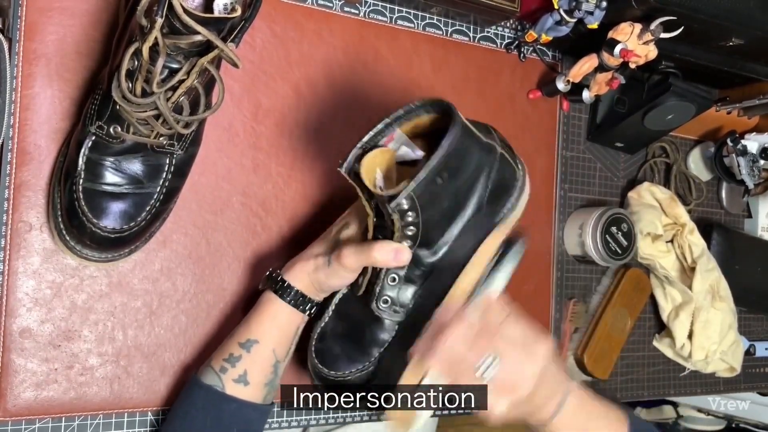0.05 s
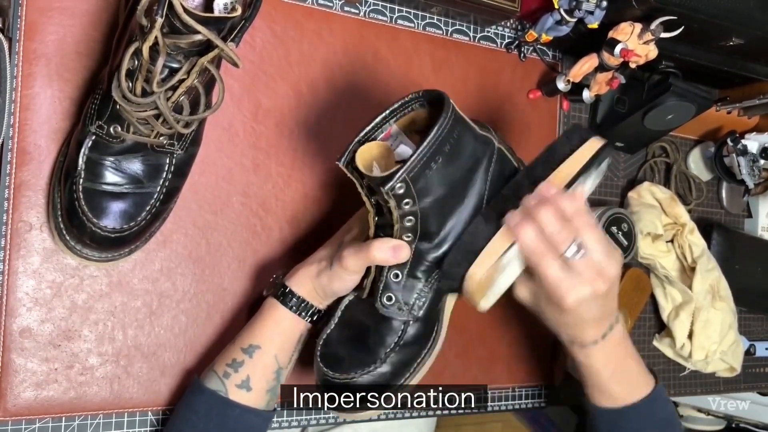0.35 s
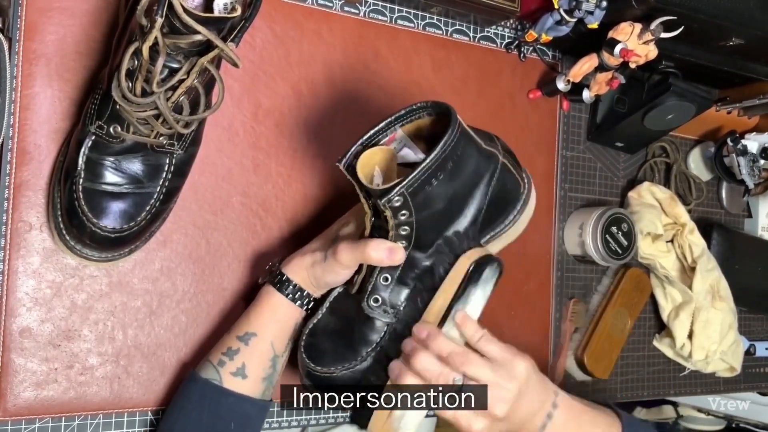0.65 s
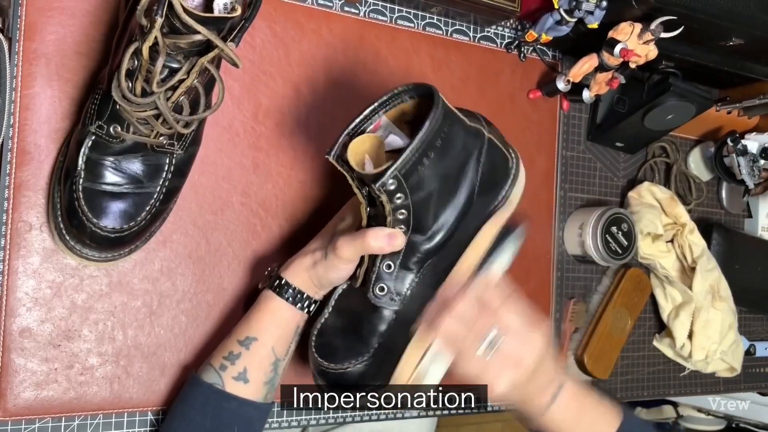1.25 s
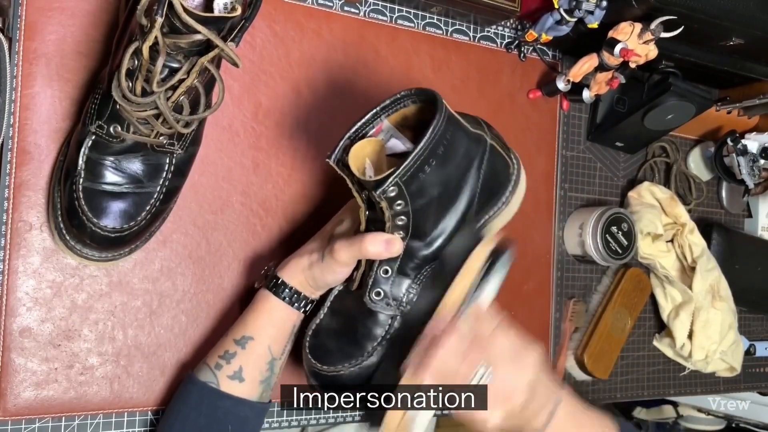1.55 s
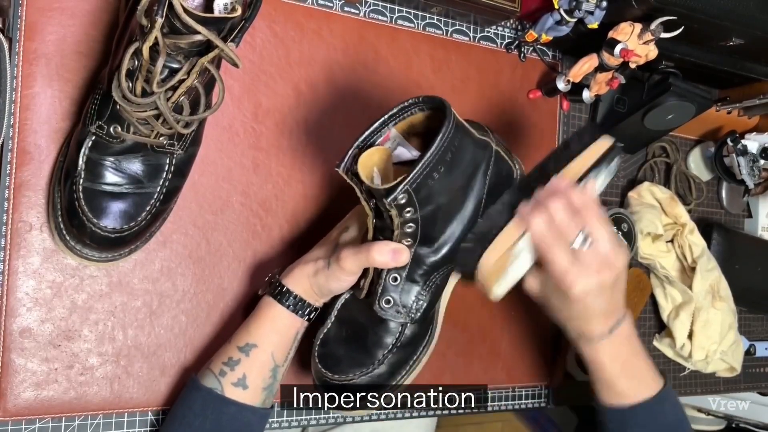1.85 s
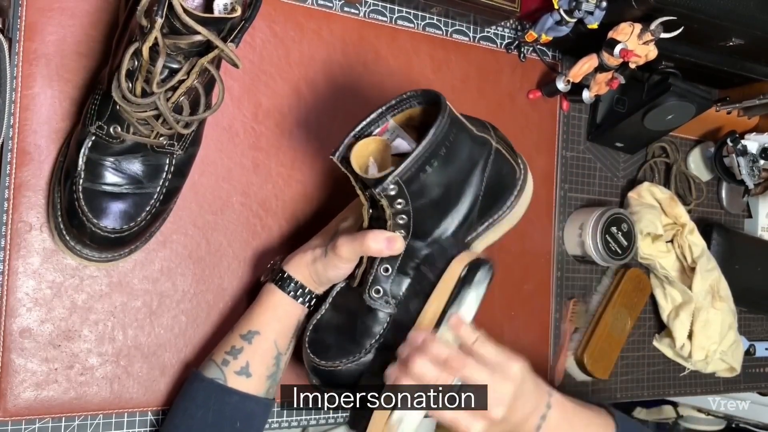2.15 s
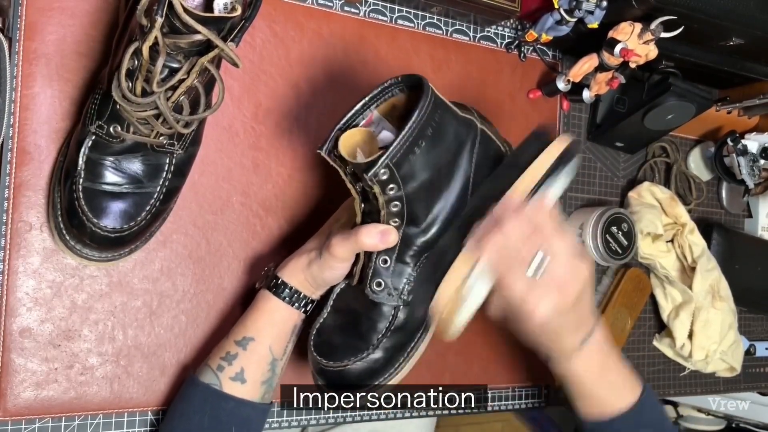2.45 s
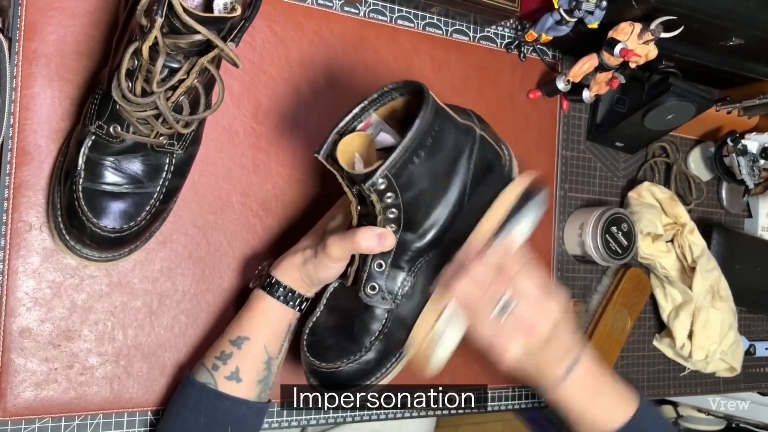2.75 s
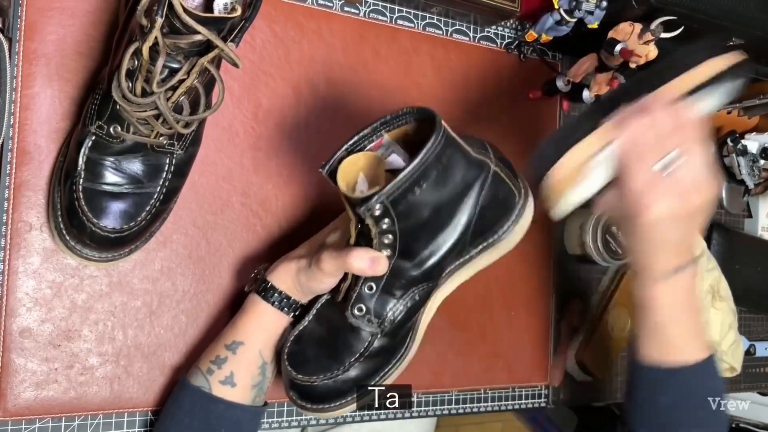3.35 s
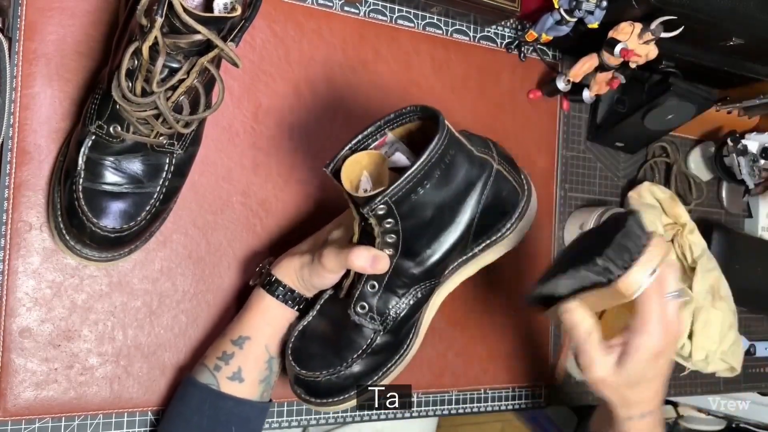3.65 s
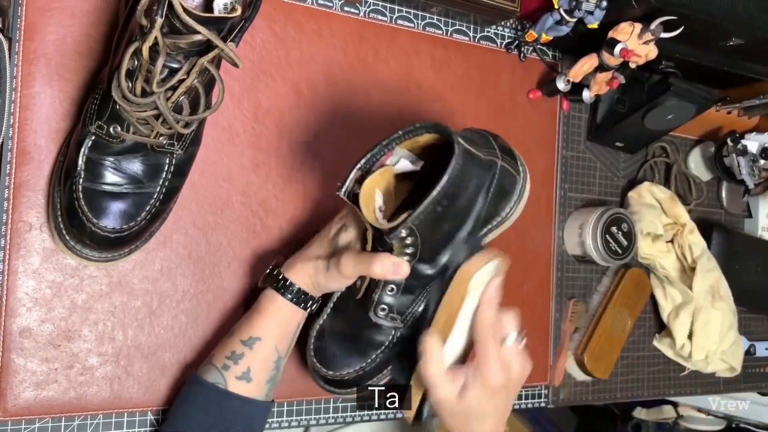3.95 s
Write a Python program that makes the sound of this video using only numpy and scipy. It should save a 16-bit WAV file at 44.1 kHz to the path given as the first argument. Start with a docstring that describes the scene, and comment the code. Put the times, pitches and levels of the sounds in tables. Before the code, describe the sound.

Fast, even brush strokes rasp and hiss on a hollow leather boot close to the microphone indoors. The scrubbing stops briefly for two sharp wooden handle clicks and a faint dull thud, then starts again.

```python
"""A bristle brush rasps and hisses back and forth over a leather boot, about nine strokes a second.
Stick-slip friction of many bristles makes the noise, and the hollow boot thumps where the brush bumps it.
The arm puffs air at each turn; air rumbles and a faint whine hangs in the small room.
Near the end the hand stops and turns the brush over with two sharp clicks of its wooden handle.
The block meets the boot with a dull thud, and the brushing goes on."""
import sys
import numpy as np
from scipy import signal
from scipy.fft import rfft, irfft
from scipy.io import wavfile
from scipy.ndimage import uniform_filter1d

SR = 44100
rng = np.random.default_rng(int(sys.argv[2]) if len(sys.argv) > 2 else 0)


def wav_out(sig):
    """Save sig, one row per channel (or a flat mono array), as 16-bit PCM at SR to the path in sys.argv[1]."""
    wavfile.write(sys.argv[1], SR, np.round(np.clip(np.atleast_2d(sig).T, -1, 1) * 32767).astype(np.int16))


N = 176400
TIME = np.arange(N) / SR


def amp(db):
    """Decibels to amplitude ratio."""
    return 10 ** (np.asarray(db) / 20)


def unit_rms(x):
    """Normalisation to unit mean power."""
    return x / np.sqrt(np.mean(x ** 2) + 1e-20)


def add(mix, start_s, sound):
    """Superposition: a sound joins the mix at its start time."""
    part = mix[max(round(start_s * SR), 0):][:len(sound)]
    part += sound[:len(part)]


def envelope(points):
    """Gain interpolated in decibels between (time [s], level [dB]) points."""
    return amp(np.interp(TIME, *np.transpose(points)))


def coloured(x, spectrum, resonances=()):
    """Minimum-phase filter of unit energy, from a spectral envelope and resonance peaks."""
    hz = abs(np.fft.fftfreq(16384, 1 / SR))
    knots_hz, knots_db = np.transpose(spectrum)
    db = np.interp(np.log(hz + 1), np.log(knots_hz + 1), knots_db)
    db += sum(lift / (1 + (2 * (hz - centre) / width) ** 2) for centre, width, lift in resonances)
    response = np.exp(np.conj(signal.hilbert(np.log(amp(db)))))
    taps = np.fft.ifft(response).real[:len(hz) // 2]
    return signal.fftconvolve(x, taps / np.linalg.norm(taps))[:len(x)]


def wander(rate_hz):
    """Random modulation: low-pass noise of rms 1."""
    hz = np.fft.rfftfreq(N, 1 / SR)
    return unit_rms(irfft(rfft(rng.standard_normal(N)) / (1 + (hz / rate_hz) ** 4), N))


def slips(per_s, spread_db):
    """Stick-slip friction as shot noise: random impulses, a few stronger than the rest."""
    size = amp(spread_db * np.minimum(rng.exponential(1, N), 5))
    return unit_rms(size * rng.choice([-1, 1], N) * (rng.random(N) < per_s / SR))


# Strokes, alternately out and back: (time [s], duration [s], pressure level [dB], hiss level [dB])
STROKE_PLAN = [(-0.006, 0.11, -1, 1.5), (0.084, 0.12, 1, -2.3), (0.211, 0.11, -0.5, 1.5),
               (0.315, 0.099, 1.7, -2.2), (0.424, 0.097, -0.3, 2.5), (0.525, 0.1, 1.5, -1),
               (0.639, 0.1, -0.8, 0.7), (0.737, 0.12, 0, -1.5), (0.851, 0.12, -2.0, 0.5),
               (0.962, 0.098, 1.8, -0.4), (1.065, 0.12, -1.4, -1.7), (1.167, 0.098, 1.0, -0.5),
               (1.27, 0.13, -1.2, -2.7), (1.377, 0.099, 0.6, -3), (1.481, 0.13, -0.5, -1.1),
               (1.6, 0.096, -0.1, -3), (1.696, 0.12, -1.5, 0.3), (1.814, 0.11, 0.8, -1.1),
               (1.919, 0.11, -0.5, 1.7), (2.03, 0.11, 1.2, -2), (2.144, 0.1, -1, 1), (2.243, 0.12, 0, -1.6),
               (2.355, 0.12, -0.4, 1), (2.463, 0.106, 1.5, -1.4), (2.572, 0.11, -0.9, 1.5),
               (2.68, 0.1, 0.1, -0.5), (2.787, 0.11, -1, 0), (2.89, 0.1, 1, -1.0), (2.996, 0.11, -0.3, 1.5),
               (3.105, 0.1, 0.8, -1.1), (3.207, 0.11, -0.7, 2.5), (3.847, 0.088, -1.5, -6.5),
               (3.961, 0.11, -4, -1)]


def stroking(shapes, settle_s, tips=False):
    """Friction noise follows sliding speed: a stroke lands, speeds up, slows and dies away."""
    gain = np.zeros(N)
    landing_s, landing_width_s = 0.017, 0.0098
    for k, (start, length, pressure_db, hiss_db) in enumerate(STROKE_PLAN):
        rise, fall, turn_db, swell_db, scuff_db = shapes[k % 2]
        on = (TIME >= start) & (TIME < start + length + 10 * settle_s)
        t = TIME[on] - start
        progress = np.minimum(t / length, 1)
        speeding = np.sin(np.pi / 2 * np.minimum(progress / rise, 1))
        slowing = np.sin(np.pi / 2 * np.minimum((1 - progress) / fall, 1))
        speed = (speeding * slowing) ** 2
        settling = np.exp(-np.maximum(t - length, 0) / settle_s)
        slide = amp(turn_db * (1 - speed) + swell_db * (progress - 1)) * settling
        scuff = amp(scuff_db) * np.exp(-((t - landing_s) / landing_width_s) ** 2)
        gain[on] = amp(hiss_db if tips else pressure_db) * np.hypot(slide, scuff)
    return uniform_filter1d(gain, size=150)


# Out and back stroke: (rise [fraction], fall [fraction], turn level [dB], swell [dB], scuff [dB])
SCRUB_STROKE = [(0.13, 0.65, -10.5, -1.9, -13), (0.23, 0.62, -5.5, 2.5, -10.5)]
# Spectrum of the scrub: (frequency [Hz], level [dB])
SCRUB_SPECTRUM = [(100, -28), (250, -6), (550, 3.5), (680, -3.5), (1150, 0.5), (1550, -1.5), (2000, 2),
                  (2500, -11), (5000, -37.5)]
# Resonances of boot and brush block: (frequency [Hz], bandwidth [Hz], lift [dB])
CONTACT_MODES = [(550, 92, 3), (725, 100, 6), (873, 77, 6), (1110, 115, 5), (1292, 30, 5), (1790, 45, 5.5),
                 (1838, 65, 2.5), (3945, 510, 5.5)]


def scrub():
    """Stick-slip of bristles on leather excites boot and block in a rough midrange scrub."""
    friction = slips(per_s=5000, spread_db=1.5) * stroking(SCRUB_STROKE, settle_s=0.011)
    roughness = amp(2.14 * wander(rate_hz=110))
    return amp(-53) * coloured(friction * roughness, SCRUB_SPECTRUM, CONTACT_MODES)


# Out and back stroke: (rise [fraction], fall [fraction], turn level [dB], swell [dB], scuff [dB])
RASP_STROKE = [(0.23, 0.35, -8.3, -1.05, -17), (0.53, 0.35, -11, -0.5, -4)]
# Spectrum of the rasp: (frequency [Hz], level [dB])
RASP_SPECTRUM = [(200, -12.5), (600, -7), (1300, 2.5), (2000, 2), (2400, 2.5), (3000, 4.5), (4000, 0),
                 (5300, 1), (6300, -7), (9000, -6.5), (16000, -24)]


def rasp(clumps):
    """Denser stick-slip drives the same resonances with a brighter spectrum."""
    friction = slips(per_s=9000, spread_db=1) * stroking(RASP_STROKE, settle_s=0.018)
    return amp(-49.5) * coloured(friction * amp(0.73 * clumps), RASP_SPECTRUM, CONTACT_MODES)


# Out and back stroke: (rise [fraction], fall [fraction], turn level [dB], swell [dB], scuff [dB])
HISS_STROKE = [(.32, 0.31, -17.5, 0.5, -28), (0.41, 0.23, -18, -3, -24)]
# Spectrum of the bristle tips: (frequency [Hz], level [dB])
HISS_SPECTRUM = [(500, 5.5), (2500, -3), (4500, 3.5), (6400, 0), (7800, 2), (10600, 1), (12400, 4),
                 (14000, 1), (16000, 1)]


def tip_hiss(clumps):
    """Shot noise: slips of the bristle tips merge into a broadband hiss."""
    friction = slips(per_s=18000, spread_db=1) * stroking(HISS_STROKE, settle_s=0.027, tips=True)
    return amp(-49) * coloured(friction * amp(0.39 * clumps), HISS_SPECTRUM)


# Out and back stroke: (rise [fraction], fall [fraction], turn level [dB], swell [dB], scuff [dB])
DRAG_STROKE = [(0.22, 0.53, -11.5, -2.5, -1.5), (0.47, 0.7, -4, 0.26, -4.5)]
# Response of the hollow boot: (frequency [Hz], level [dB])
BOOT_SPECTRUM = [(40, -4), (130, -28.5), (200, -7), (235, -11), (275, -2), (320, -4), (370, -6), (440, -7),
                 (510, -26.5), (800, -24), (2000, -50.5)]
# Resonances of its cavity: (frequency [Hz], bandwidth [Hz], lift [dB])
CAVITY_MODES = [(276, 31, 2.5), (317, 26, 1.5), (362, 22, 1.5), (392, 27, 1)]


def hollow_boot():
    """Forced vibration: the dragging brush drums the boot and its cavity."""
    drag = rng.standard_normal(N) * stroking(DRAG_STROKE, settle_s=0.035)
    return amp(-47.5) * coloured(drag, BOOT_SPECTRUM, CAVITY_MODES)


def shifting_contact(x, depth_db, bins, frames):
    """Time-varying filtering: the colour shifts at random as the brush meets other parts of the boot."""
    spectra = signal.stft(x, nperseg=512, noverlap=384)[2]
    patches = uniform_filter1d(rng.standard_normal(spectra.shape), bins, axis=0)
    patches = uniform_filter1d(patches, frames, axis=1)
    gain = unit_rms(amp(depth_db * unit_rms(patches)))
    return signal.istft(spectra * gain, nperseg=512, noverlap=384)[1][:N]


def brushing():
    """The friction sources superpose; clumping bristles modulate rasp and hiss together."""
    clumps = wander(rate_hz=94)
    leather = scrub() + rasp(clumps)
    hiss = tip_hiss(clumps)
    return shifting_contact(leather + hollow_boot(), depth_db=1.18, bins=7, frames=14) + hiss


def air_puffs(width_s=0.014):
    """Air displacement: each turn of the arm sends out a soft pressure pulse."""
    starts = np.array(STROKE_PLAN)[:, :1]
    u = (TIME - starts) / width_s
    pulses = (1 - u ** 2 / 2) * np.exp(-u ** 2 / 4)
    return amp(-31.5) * pulses.sum(0)


# Air stirred by the arm: (time [s], level [dB])
DRAUGHT_LEVELS = [(0, -35.5), (1.4, -38), (2.7, -37), (3.42, -33), (3.58, -41), (3.88, -45.5), (4, -26.5)]
# Spectrum of the moving air: (frequency [Hz], level [dB])
AIR_SPECTRUM = [(4, -8.5), (9, -1), (15, 9.5), (22, -5), (36, -1), (50, -17.5), (68, -18), (90, -31.5),
                (130, -39), (300, -71), (1000, -75)]
# Spectrum of the quiet room: (frequency [Hz], level [dB])
ROOM_SPECTRUM = [(60, 3), (130, -3), (210, 2), (400, -10.5), (680, -13.5), (930, -9), (1300, -15.5),
                 (2500, -24), (5000, -26), (8000, -31), (15500, -30)]


def background():
    """Ambient noise: rumbling air, a steady room floor and a frequency-modulated electrical whine."""
    air = envelope(DRAUGHT_LEVELS) * unit_rms(coloured(rng.standard_normal(N), AIR_SPECTRUM))
    floor = amp(-62.5) * coloured(rng.standard_normal(N), ROOM_SPECTRUM)
    whine_hz = 11515 + 26.2 * wander(rate_hz=38)
    whine = np.sin(2 * np.pi * np.cumsum(whine_hz) / SR)
    return air + floor + amp(-73) * unit_rms(whine)


# The brush bumps the boot: (time [s], level [dB], frequency [Hz])
BOOT_BUMPS = [(0.127, -39, 325), (0.158, -33, 316), (0.545, -39, 284), (0.666, -46, 366), (0.793, -31, 300),
              (0.902, -32, 342), (0.929, -39, 330), (1.011, -40.5, 353), (1.217, -32.5, 297),
              (1.306, -35, 410), (1.525, -31.5, 383), (1.645, -31.5, 354), (1.655, -37.5, 318),
              (1.719, -41, 330), (1.836, -36.5, 360), (2.055, -34, 357), (2.176, -39, 363),
              (2.265, -37, 313), (2.299, -32.5, 312), (2.478, -36.5, 347), (2.512, -32.5, 293),
              (2.698, -39.5, 320), (2.721, -35.5, 368), (2.939, -36.5, 336), (3.018, -32.5, 310),
              (3.166, -35, 330), (3.236, -36.5, 297), (3.272, -37, 330), (3.79, -41.5, 335),
              (3.867, -41.5, 340), (3.977, -49, 360), (3.991, -41, 402)]


def bumps(rise_s=0.0025, decay_s=0.0062):
    """Damped oscillation: each bump shoves the boot, rings it briefly and scrapes a tuft of bristles."""
    t = np.arange(SR // 16) / SR
    pulse = np.minimum(t / rise_s, 1) * np.exp(-np.maximum(t - rise_s, 0) / decay_s)
    thump, push = np.zeros(N), np.zeros(N)
    for start, db, hz in BOOT_BUMPS:
        force = amp(db - 0.04) * pulse
        add(thump, start, force * np.sin(2 * np.pi * hz * t))
        add(push, start, force)
    scrape = coloured(push * rng.standard_normal(N), RASP_SPECTRUM, CONTACT_MODES)
    return thump + amp(-8.5) * push + amp(-19) * scrape


# Handle clicks: (time [s], level [dB], rebound interval [s], gain per rebound [dB], contact cutoff [Hz])
HANDLE_CLICKS = [(3.584, -50, 0.00088, 2, 6000), (3.693, -20, 0.00092, -6.5, 6170),
                 (3.697, -30, 0.00054, -10, 6000), (3.791, -37.5, 0.0013, 8.5, 3000),
                 (3.826, -19.5, 0.00061, -2.5, 12000)]
# Fingers sliding on the handle: (time [s], level [dB])
GRIP_LEVELS = [(3.68, -98), (3.70, -56), (3.733, -68), (3.74, -55), (3.755, -62), (3.785, -59.5),
               (3.80, -57), (3.82, -61), (3.838, -47), (3.855, -68), (3.88, -57)]
# Response of the wooden handle: (frequency [Hz], level [dB])
HANDLE_SPECTRUM = [(200, -19), (550, -4.5), (1000, -14.5), (1700, -6.5), (2500, -3.5), (3300, -3),
                   (4100, 1.5), (5300, -4), (6600, -10), (7700, -7), (10000, -14), (13000, -14),
                   (16000, -23)]


def handling(contacts=3, t60_s=0.023):
    """Impact and rebound: the handle clicks and rings briefly, and finger friction makes it rustle."""
    t = np.arange(SR // 30) / SR
    knocks = np.zeros(N)
    for start, db, gap_s, step_db, cutoff_hz in HANDLE_CLICKS:
        blow = t * np.exp(-2 * np.pi * cutoff_hz * t)
        ring = rng.standard_normal(len(t)) * amp(-60 * t / t60_s)
        click = blow + amp(-11) * signal.fftconvolve(blow, ring / np.linalg.norm(ring))[:len(t)]
        for k in range(contacts):
            add(knocks, start + k * gap_s, amp(db + k * step_db) * click / blow.sum())
    rustle = envelope(GRIP_LEVELS) * slips(per_s=14000, spread_db=1)
    return coloured(knocks + rustle, HANDLE_SPECTRUM)


# The wooden block comes down on the boot: (time [s], level [dB])
BLOCK_THUDS = [(3.788, -43.5)]


def thud(hz=152, decay_s=0.002):
    """Heavily damped impact: the weight of the brush pushes the boot against the padded table."""
    t = np.arange(SR // 16) / SR
    pulse = t / decay_s * np.exp(1 - t / decay_s)
    out = np.zeros(N)
    for start, db in BLOCK_THUDS:
        add(out, start, amp(db) * pulse * np.sin(2 * np.pi * hz * t))
    return out


def room(x, t60_s=0.37):
    """Reverberation: early reflections from table and walls, and an exponentially decaying tail."""
    t = np.arange(SR // 3) / SR
    tail = rng.standard_normal(len(t)) * amp(-60 * t / t60_s) * (t > 0.006)
    early = np.zeros(len(t))
    early[rng.integers(SR // 400, SR // 80, size=8)] = rng.choice([-1, 1], size=8)
    taps = amp(-16) * tail / np.linalg.norm(tail) + amp(-17) * early / np.linalg.norm(early)
    return x + signal.fftconvolve(x, taps)[:N]


def scene():
    """Superposition in one channel: brush and boot reverberate over the air and ambient noise."""
    return (room(brushing() + bumps() + handling() + thud()) + air_puffs() + background())[None]


def record(dry):
    """Band limiting: a linear-phase low-pass filter removes the highest treble."""
    taps = signal.firwin(511, cutoff=15830, window=("kaiser", 9), fs=SR)
    return signal.oaconvolve(dry, taps[None], "same")


dry = scene()
out = record(dry)
wav_out(out)
```